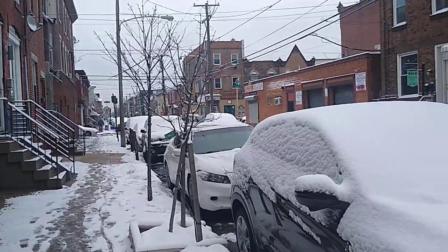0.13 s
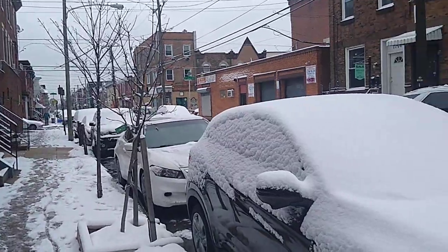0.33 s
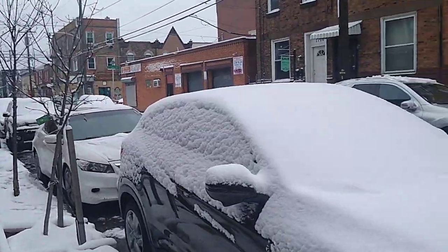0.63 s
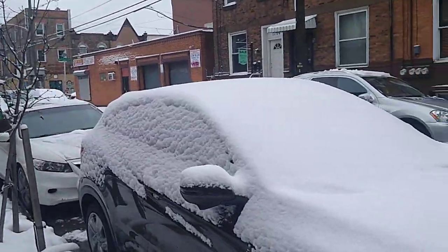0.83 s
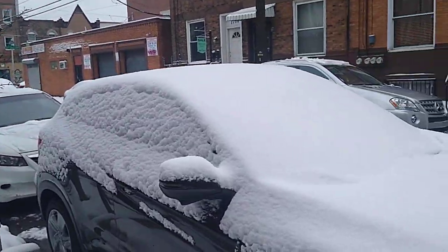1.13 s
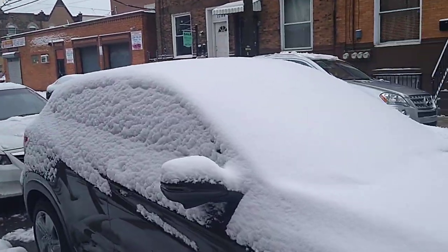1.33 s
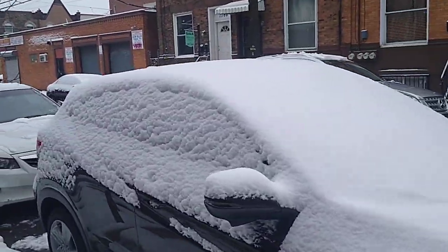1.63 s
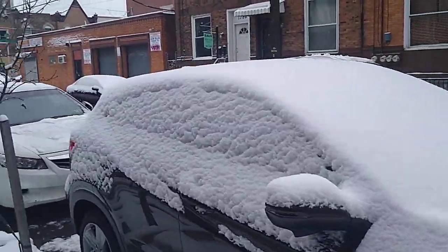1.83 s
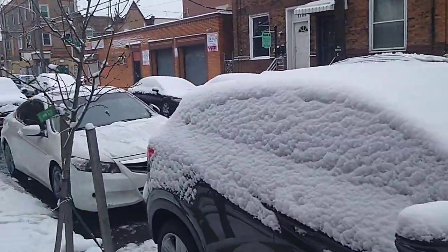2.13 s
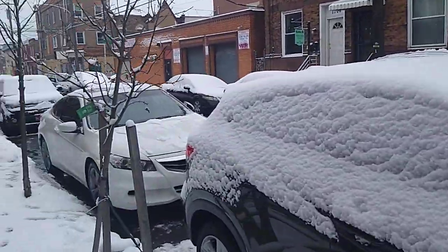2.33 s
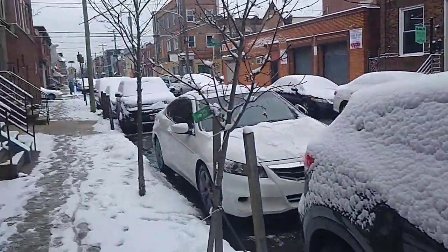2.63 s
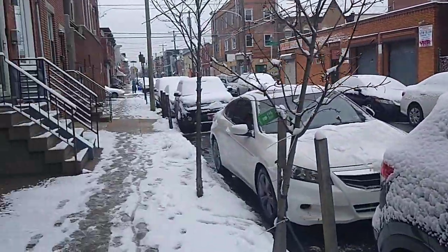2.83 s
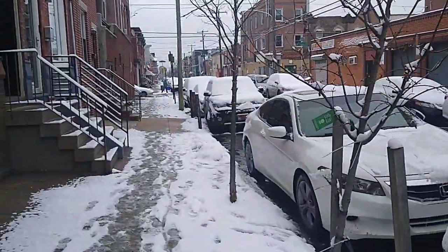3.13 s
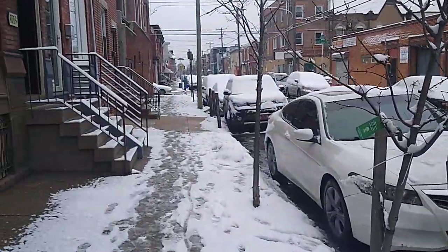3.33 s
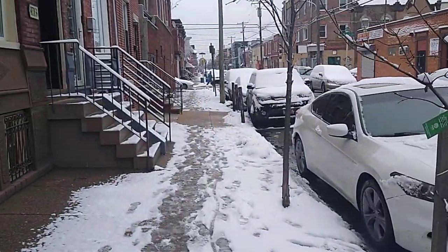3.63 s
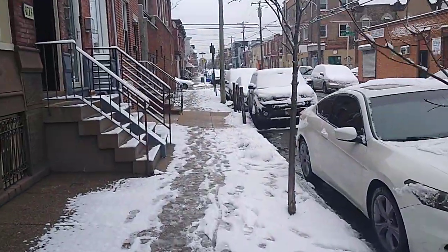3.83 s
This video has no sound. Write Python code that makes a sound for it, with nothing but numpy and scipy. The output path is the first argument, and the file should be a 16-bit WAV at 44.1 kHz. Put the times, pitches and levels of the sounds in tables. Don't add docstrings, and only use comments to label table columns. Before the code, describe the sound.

Crisp boot steps press and crack crusty snow while low wind thumps the microphone outdoors

```python
import sys
import numpy as np
from scipy import signal
from scipy.fft import rfft, irfft
from scipy.io import wavfile
from scipy.ndimage import uniform_filter1d

SR = 44100
rng = np.random.default_rng(int(sys.argv[2]) if len(sys.argv) > 2 else 0)


def unload_audio(sound):
    columns = np.transpose(np.atleast_2d(sound))
    steps = np.round(np.clip(columns, -1, 1) * 32767)
    wavfile.write(sys.argv[1], SR, steps.astype(np.int16))


def natural_amplitude(level_db):
    exponent = np.asarray(level_db, float) / 20
    return 10 ** exponent


N = 176400
T = np.arange(N) / SR


def rms_one(x):
    return x / np.sqrt(np.mean(x ** 2) + 1e-20)


def colour(x, points, share=1):
    hz, db = np.transpose(points)
    grid = np.maximum(np.arange(N // 2 + 1) * SR / N, 1)
    gain_db = share * np.interp(np.log(grid), np.log(hz), db)
    return irfft(rfft(x) * natural_amplitude(gain_db), N)


def lowpass(x, order, hz):
    return signal.sosfilt(signal.butter(order, hz, fs=SR, output="sos"), x)


def drift(rate_hz):
    r = np.exp(-2 * np.pi * rate_hz / SR)
    wander = signal.lfilter([1], [1, -2 * r, r * r], rng.standard_normal(N + SR))
    return rms_one(wander[SR:])


def window(s, length, attack, release):
    rise = np.clip((T - s) / attack, 0, 1)
    return rise * np.exp(-np.maximum(T - s - length, 0) / release)


def peak(x, hz, width_hz):
    r = np.exp(-np.pi * width_hz / SR)
    poles = [1, -2 * r * np.cos(2 * np.pi * hz / SR), r * r]
    return signal.lfilter([(1 - r * r) / 2, 0, (r * r - 1) / 2], poles, x + 1e-18)


def band(hz, width_hz):
    once = peak(rng.standard_normal(N), hz, width_hz)
    return rms_one(peak(once, hz, width_hz))


def apart(x, hz, low_db, high_db, rate_hz):
    low = lowpass(x, 1, hz)
    return low * natural_amplitude(low_db * drift(rate_hz)) + (x - low) * natural_amplitude(high_db * drift(rate_hz))


def ports(shared, own, alike):
    # frequency in Hz,
    # tilt in dB before each port's share.
    port_tilt = [(300, 2.5), (1300, -2), (2400, -1.5), (4400, -4.5), (8000, -5.5), (10500, 2), (13000, 3.5),
                 (16000, 8)]
    right_lag_s = .0001
    alike = np.clip(alike, 0, 1)
    hz = np.arange(N // 2 + 1) * SR / N
    late = irfft(rfft(shared) * np.exp(-2j * np.pi * hz * right_lag_s), N)
    left, right = np.sqrt(alike) * np.array([shared, late]) + np.sqrt(1 - alike) * own
    return np.array([colour(left, port_tilt, share=0.82), colour(right, port_tilt, share=-0.85)])


def street():
    # time in seconds, level in dB.
    traffic_swell = [(0.0, -59.5), (0.37, -63.5), (0.78, -60), (1.1, -64.5), (1.5, -61), (2.0, -60.5),
                     (2.22, -63.5), (2.6, -59), (3.38, -61), (3.48, -61), (3.65, -64.5), (3.87, -65.5),
                     (4.0, -60.5)]
    # frequency in Hz, density in dB per Hz.
    hush_body = [(200, 1), (490, -5.5), (660, 0.5), (1270, -11), (1950, -6.5), (2600, -11.5), (4200, -14),
                 (5200, -21)]
    hush_top = [(8500, -30.5), (13000, -25), (16000, -28)]
    outline = [(60, 5.3)] + list(hush_body) + list(hush_top)
    hush = np.array([rms_one(colour(w, outline)) for w in rng.standard_normal((3, N))])
    hush = apart(hush, 2700, low_db=2.86, high_db=0.87, rate_hz=6.5)
    level_db = np.interp(T, *np.transpose(traffic_swell)) + 5
    return natural_amplitude(level_db) * ports(hush[0], hush[1:], alike=0.23)


def drone():
    # time in seconds, level in dB.
    drone_swell = [(0, -73), (.45, -68.5), (.65, -55), (1.05, -71), (1.3, -61.5), (1.6, -62.5),
                   (2.1, -66.5), (2.9, -69.5), (3.25, -58.5), (3.6, -68), (4, -82)]
    motor = natural_amplitude(-65) * window(2.7, .27, 0.025, 0.015) * band(237, 10)
    level_db = np.interp(T, *np.transpose(drone_swell)) + 3.2 * drift(24)
    return natural_amplitude(level_db) * band(345, 162) + motor


def evened(x):
    even_s = .09
    return x / np.sqrt(uniform_filter1d(x ** 2, size=int(even_s * SR)) + .05)


def wind():
    # time in seconds, level in dB.
    gust_swell = [(0.0, -39), (0.19, -46), (0.32, -57), (0.75, -42.5), (1.12, -57), (1.43, -39.5),
                  (1.46, -48), (1.77, -40.5), (1.78, -48), (1.9, -33.5), (2.15, -49), (2.88, -37),
                  (2.97, -47), (3.42, -39.5), (3.52, -59), (3.81, -69), (3.89, -48), (4.0, -50)]
    # frequency in Hz, density in dB per Hz.
    wind_spectrum = [(15, -71), (25, -71), (51, 4.5), (81, 7), (156, -4.5), (208, -13.5), (307, -26.5),
                     (500, -45), (650, -102), (1100, -120)]
    left_db, top = -18, 0.22
    gust_db = np.interp(T, *np.transpose(gust_swell))
    level = natural_amplitude(gust_db + 5.5 + 6 * np.tanh(drift(28)))
    outline = [(10, -60)] + list(wind_spectrum) + [(900, -70)]
    right, left = (evened(rms_one(colour(rng.standard_normal(N), outline))) for _ in "ab")
    flutter_db = -54 + 1.15 * (gust_db + 43) + 11.7 * np.tanh(drift(27.6))
    flutter = band(166.6, 150) * natural_amplitude(flutter_db)
    return np.array([natural_amplitude(left_db) * level * left,
                     top * np.tanh(level * right / top) + flutter + thumps()])


def thumps():
    # start in seconds, peak in dB, pitch in Hz.
    slaps = [(.004, -32.5, 208), (0.034, -32, 115), (0.109, -34, 101), (0.576, -37.5, 248),
             (0.669, -41.5, 153), (1.305, -48, 100), (1.697, -32.5, 147), (1.751, -33.5, 118),
             (1.829, -32, 103), (1.998, -29, 141), (2.349, -36, 131), (2.693, -41, 145), (2.794, -24, 116),
             (3.003, -58, 104), (3.379, -45, 105)]
    cycles = 2.26
    out = 0
    for s, db, hz in slaps:
        turn = np.maximum(T - s, 0) * hz
        swell = turn * np.exp(1 - 3.33 * turn / cycles)
        out = out + natural_amplitude(db + 6.0) * np.sin(2 * np.pi * turn) * swell
    return out


def grains(per_s, spread_db):
    sizes_db = spread_db * np.minimum(rng.exponential(1, N), 4)
    sizes = natural_amplitude(sizes_db) * rng.choice([-1, 1], N)
    return rms_one(sizes * (rng.random(N) < per_s / SR))


def crunch():
    # start in seconds, length in seconds, level in dB, pitch in Hz.
    packings = [(0.016, .02, -52, 1910), (0.059, 0.026, -55, 645), (0.077, 0.1, -58.5, 1170),
                (0.68, 0.018, -45.5, 750), (0.696, 0.025, -52.5, 1260), (0.739, .01, -46, 1400),
                (0.753, 0.015, -46, 1390), (0.763, 0.0048, -41, 810), (1.342, .045, -55, 800),
                (1.395, 0.063, -61, 1210), (1.866, 0.015, -41, 1640), (1.881, 0.032, -52, 1660),
                (1.933, 0.056, -53.5, 950), (2.582, 0.047, -51, 1090), (2.636, 0.015, -48.5, 1460),
                (3.184, 0.0066, -42, 810), (3.203, 0.047, -50.5, 1150), (3.26, 0.045, -58, 1160),
                (3.843, 0.035, -49, 690), (3.872, 0.041, -48, 1350), (3.921, 0.045, -49.5, 1530)]
    clumps = natural_amplitude(2.0 * np.tanh(drift(94)))
    coarse = lowpass(grains(2300, spread_db=1.5) * clumps, 2, 3000)
    sole = 0.71 * rms_one(peak(coarse, 420, 210))
    out = 0
    for s, d, db, hz in packings:
        width_hz = 0.88 * hz
        ring = rms_one(peak(peak(coarse, hz, width_hz), hz, width_hz))
        out = out + natural_amplitude(db) * window(s, d, 0.15 * d + 0.01, 0.006) * (ring + sole)
    return out


def hiss():
    # start in seconds, length in seconds, level at contact in dB,
    # fall until lift in dB.
    presses = [(0.017, 0.18, -47.5, 16), (0.573, 0.023, -58.5, -4), (0.599, 0.18, -49.5, 3.5),
               (1.309, .17, -50, 16.5), (1.871, 0.12, -39, 16.5), (2.552, 0.013, -46, 5),
               (2.573, 0.086, -52, 2.5), (3.006, 0.012, -51, 5), (3.135, 0.035, -31, 29.5),
               (3.186, 0.066, -49.5, 6), (3.26, 0.059, -47.5, 15), (0.56, 0.015, -62, 3),
               (3.82, 0.072, -50, -2), (3.894, 0.08, -52, 16)]
    # frequency in Hz, density in dB per Hz.
    grain_spectrum = [(300, -3), (1300, -8), (2000, 2), (2600, -0.5), (7000, -5), (9000, -9.5),
                      (13000, -4.5), (16000, -8.5)]
    load = 0
    for s, d, db, fall_db in presses:
        level_db = db - fall_db * np.clip((T - s) / d, 0, 1)
        load = load + natural_amplitude(level_db) * window(s, d, 0.0054, 0.0035)
    fine = [rms_one(colour(grains(6000, spread_db=3.5), grain_spectrum)) for _ in "abc"]
    fine = apart(np.array(fine), 6800, low_db=1.1, high_db=1.4, rate_hz=23)
    return load * natural_amplitude(1.63 * drift(63)) * fine


def echoes(x):
    age = np.arange(int(.2 * SR)) / SR
    tail = rng.standard_normal((2, len(age))) * np.exp(-age / 0.079) * (age > .002)
    tail = tail / np.sqrt(np.sum(tail ** 2) / 2)
    return natural_amplitude(-9) * signal.fftconvolve(x[None], tail, axes=1)[:, :N]


def glide(s, d, hz0, hz1, bend):
    progress = np.clip((T - s) / d, 0, 1) ** bend
    return 2 * np.pi * np.cumsum(hz0 + (hz1 - hz0) * progress) / SR


def sliding(rows, width_hz, bed):
    a, b = (rms_one(v) for v in lowpass(rng.standard_normal((2, N)), 2, width_hz / 2))
    out = 0
    for s, d, db, hz0, hz1 in rows:
        phase = glide(s, d, hz0, hz1, bend=.88)
        rub = a * np.sin(phase) + b * np.cos(phase)
        out = out + natural_amplitude(db) * window(s, d, 0.0028, 0.012) * (rub + bed)
    return out


def jacket():
    # start in seconds, length in seconds, level in dB, start and end pitch in Hz.
    squeak_rows = [(.205, 0.017, -63, 1600, 1544), (.243, 0.05, -60, 1660, 1790),
                   (.33, .15, -64.5, 1900, 2153), (.21, 0.031, -57.5, 4250, 4100),
                   (.255, 0.033, -64, 3380, 3720), (1.041, 0.034, -68.5, 4070, 4100),
                   (3.424, .01, -51, 3330, 2990), (3.444, .014, -57, 2990, 2960),
                   (3.472, 0.023, -55.5, 2910, 3000), (3.496, 0.011, -58, 3310, 3330),
                   (3.54, 0.012, -56.5, 3000, 3100), (3.56, 0.036, -62, 3570, 3830),
                   (3.592, 0.012, -62, 2250, 2260), (3.61, 0.038, -61.5, 2900, 3040),
                   (3.735, 0.025, -63.5, 2220, 2310), (3.74, 0.014, -64, 2890, 2920)]
    # start in seconds, length in seconds,
    # level in dB, start and end pitch in Hz.
    rasp_rows = [
        (2.85, 0.079, -70, 3960, 4180),
        (3.01, 0.0071, -56, 3900, 3800),
        (3.42, 0.019, -58, 6000, 5480),
        (3.428, 0.036, -59.5, 5200, 4700),
        (3.47, 0.033, -56, 5340, 5430),
        (3.54, 0.047, -57.5, 5450, 4930),
        (3.58, 0.061, -64.5, 4920, 5060),
        (3.73, .04, -64, 4930, 5100),
    ]
    # start in seconds, length in seconds, level in dB.
    swish_rows = [
        (.42, 0.1, -75),
        (1.176, 0.014, -73),
        (1.512, 0.015, -68),
        (1.654, 0.051, -73),
        (1.81, 0.064, -72),
        (2.046, 0.0088, -65.5),
        (2.759, .25, -77),
        (3.415, 0.26, -78),
        (3.72, .05, -74),
    ]
    swish = band(13450, 6000) * sum(natural_amplitude(db) * window(s, d, 0.26 * d, 0.011) for s, d, db in swish_rows)
    rasps = sliding(rasp_rows, 510, bed=natural_amplitude(-4.5) * band(2400, 4600))
    squeaks = natural_amplitude(1.3 * drift(55)) * sliding(squeak_rows, 240, bed=0)
    return swish + rasps + squeaks


def sparrows():
    # start in seconds, length in seconds, level in dB, start and end pitch in Hz.
    chirp_rows = [
        (.21, .014, -62, 6050, 5400),
        (.226, 0.026, -62, 5270, 5480),
        (.43, .135, -71.5, 4580, 4850),
        (1.206, .019, -63.5, 5470, 5750),
        (1.212, 0.037, -68, 5950, 5160),
    ]
    out = 0
    for s, d, db, hz0, hz1 in chirp_rows:
        whistle = np.sin(glide(s, d, hz0, hz1, bend=0.51))
        out = out + natural_amplitude(db) * window(s, d, 0.0054, 0.0069) * whistle
    return natural_amplitude(3.2 * drift(90)) * out


def snaps():
    # start in seconds, peak in dB, pitch in Hz.
    snap_rows = [(.583, -30.5, 1010), (.585, -35.5, 420), (.593, -53, 1400), (.741, -36, 1380),
                 (.759, -37, 1240), (.774, -42, 930), (.81, -59, 398), (1.019, -49.5, 364),
                 (1.182, -42, 1390), (1.309, -52, 375), (1.316, -45, 3300), (1.353, -49, 687),
                 (1.358, -46, 1330), (1.373, -47, 890), (1.379, -47, 900), (1.587, -43, 1130),
                 (1.65, -48.5, 367), (1.824, -38.5, 465), (1.877, -44, 600), (1.879, -31, 890),
                 (1.977, -36.5, 1400), (1.982, -29.5, 1430), (2.096, -43, 1270), (2.463, -52.5, 805),
                 (2.489, -48, 1110), (2.555, -40.5, 2000), (2.584, -50, 1300), (2.647, -41.5, 1360),
                 (2.73, -55, 320), (3.01, -32, 426), (3.015, -40.5, 1450), (3.188, -41, 690),
                 (3.216, -42, 1200), (3.234, -45, 990), (3.265, -43, 1500), (3.386, -42.5, 326),
                 (3.6, -52.5, 705), (3.849, -51, 620), (3.867, -32.5, 820), (3.907, -42, 1010),
                 (3.934, -38, 1400), (3.939, -39, 1500), (3.948, -30, 1530), (3.957, -36, 1680),
                 (3.962, -40, 1640), (3.967, -53, 1700), (3.975, -40, 1700), (3.985, -47, 1500)]
    cycles, tail_db, tail_s = 5.5, -10.5, 0.0024
    age = np.arange(SR // 20) / SR
    out, debris = np.zeros(N + len(age)), band(1470, 1480)
    for s, db, hz in snap_rows:
        i = int(s * SR)
        turn = age * hz * 9.0 / cycles
        ring = np.sin(2 * np.pi * hz * age) * turn * np.exp(1 - turn * 1.396) * 1.95
        puff = natural_amplitude(tail_db) * np.roll(debris, -i)[:len(age)] * np.exp(-age / tail_s)
        out[i:i + len(age)] += natural_amplitude(db) * (ring + puff)
    return out[:N]


def scene():
    fine = hiss()
    solid = crunch() + snaps()
    cloth_and_birds = jacket() + sparrows()
    near = ports(fine[0], fine[1:], alike=0.17) + ports(solid + cloth_and_birds, 0, alike=0.9)
    far = street() + ports(drone(), 0, alike=1.0)
    return 1.182 * near + echoes(fine[0] + solid) + wind() + far


def roll_off(x):
    return signal.sosfilt(signal.butter(12, 16530, fs=SR, output="sos"), x)


def record(dry):
    steep = signal.ellip(14, .5, 75, 15850, fs=SR, output="sos")
    mix = signal.sosfilt(steep, dry)
    return roll_off(mix)


dry = scene()
out = record(dry)
unload_audio(out)
```